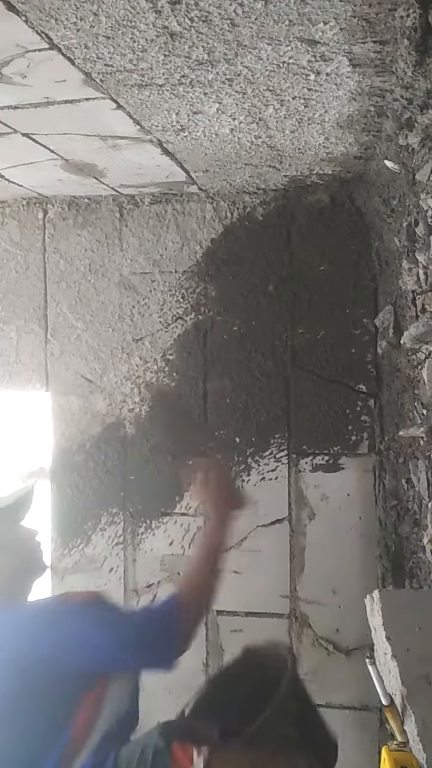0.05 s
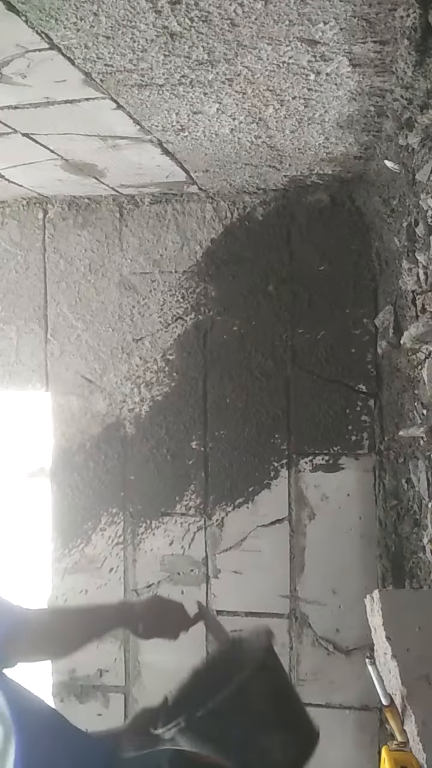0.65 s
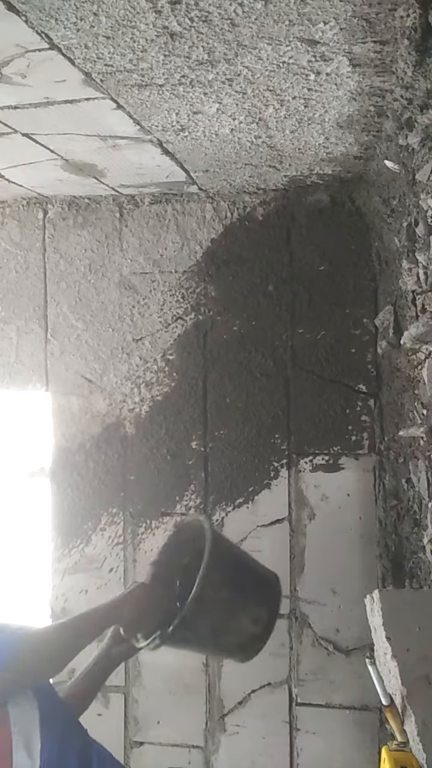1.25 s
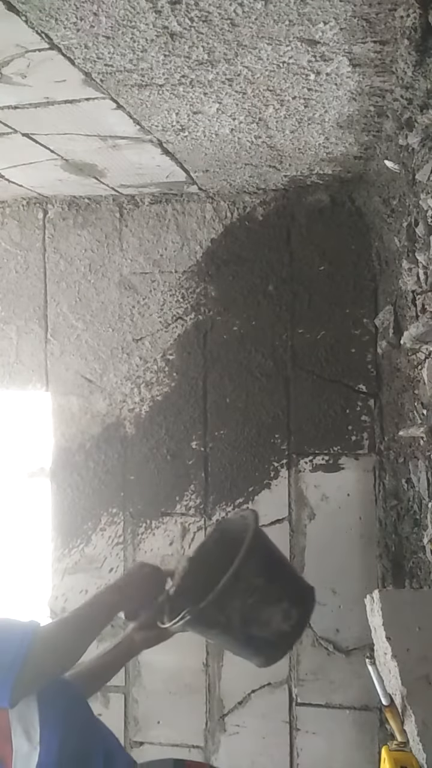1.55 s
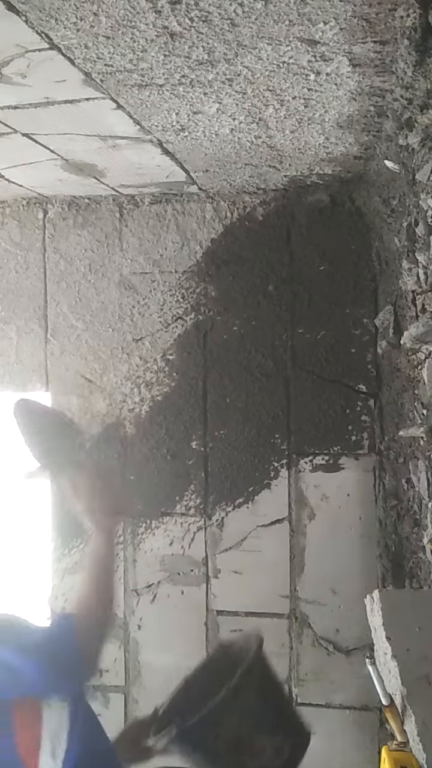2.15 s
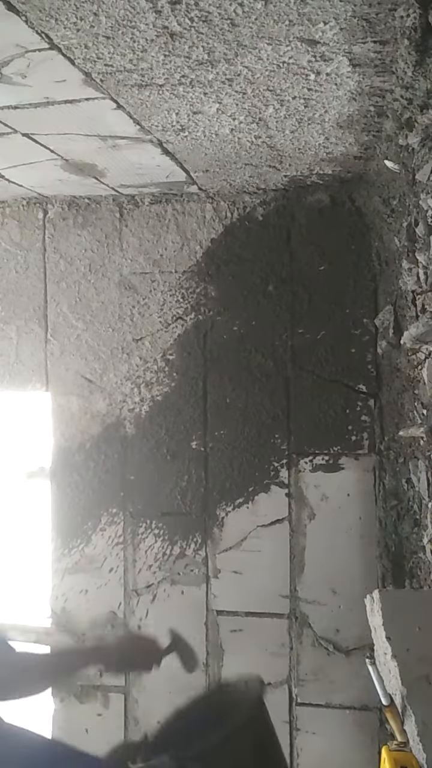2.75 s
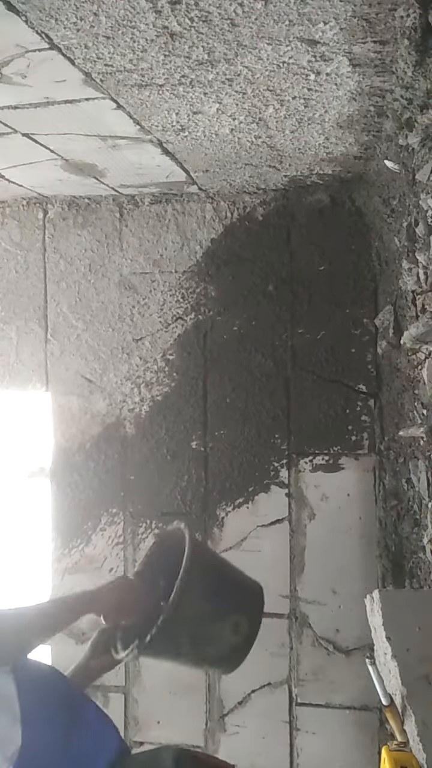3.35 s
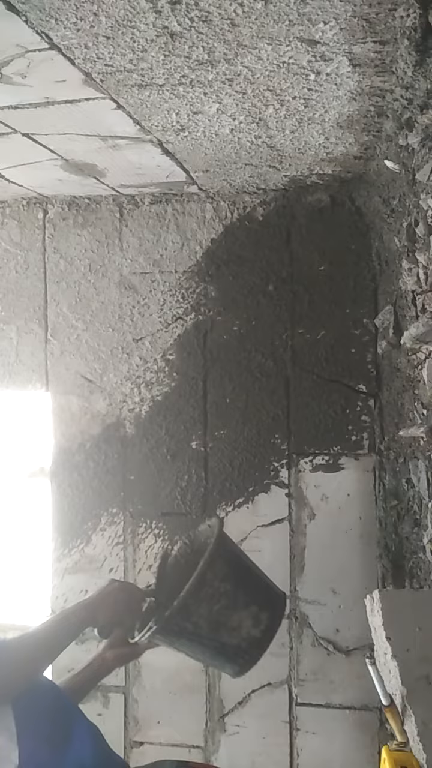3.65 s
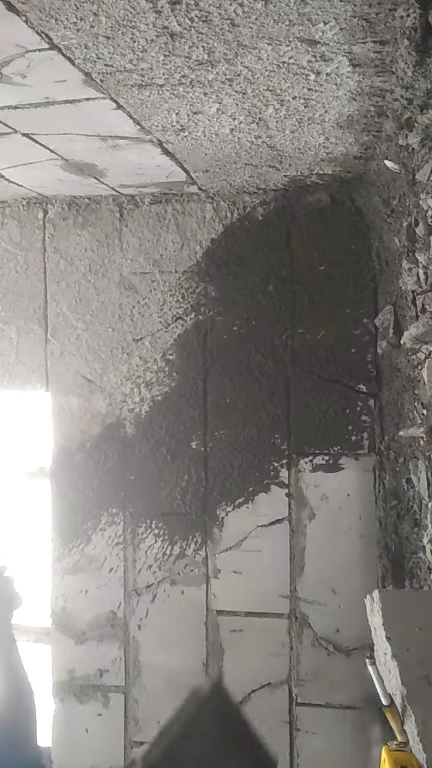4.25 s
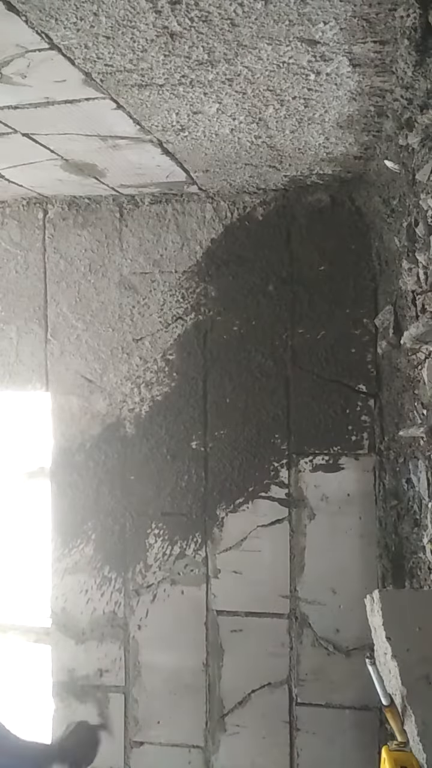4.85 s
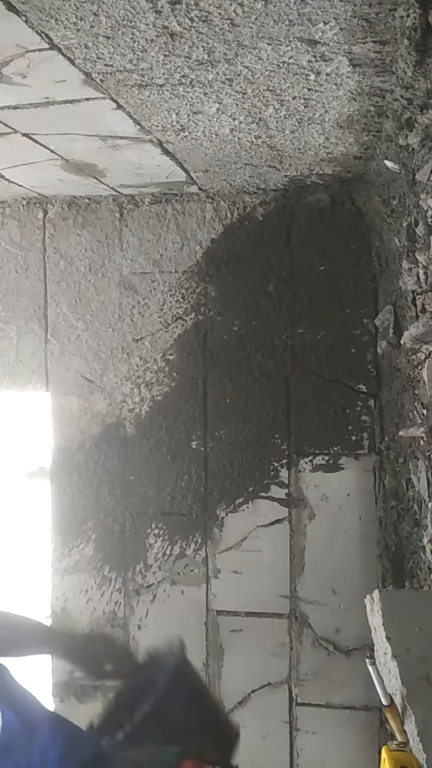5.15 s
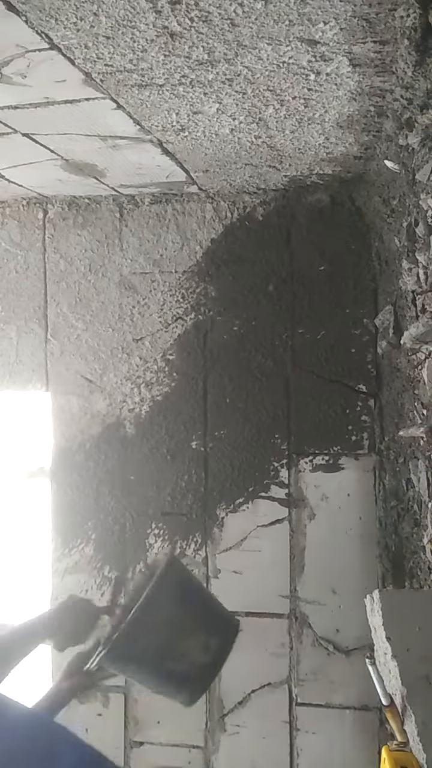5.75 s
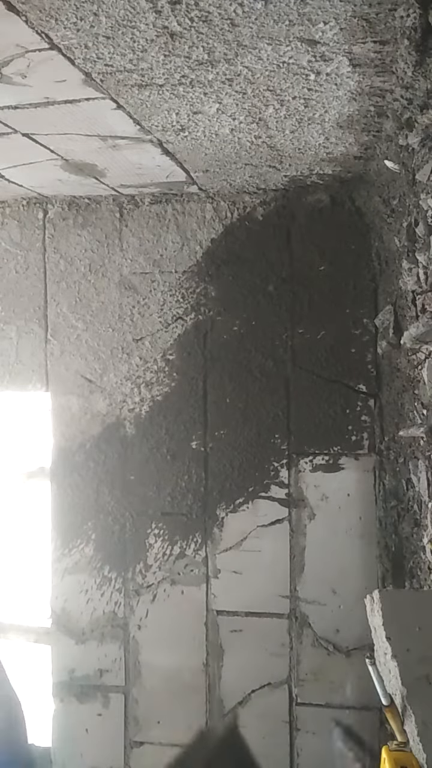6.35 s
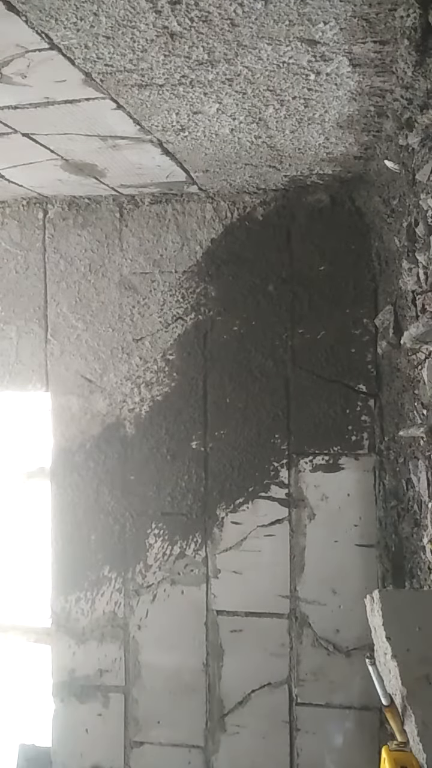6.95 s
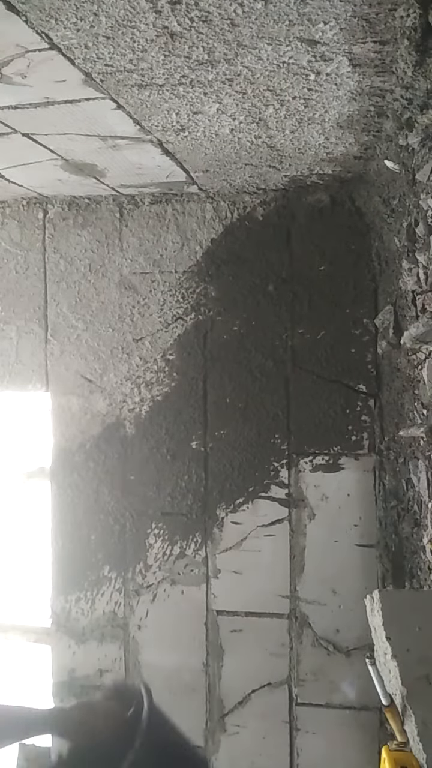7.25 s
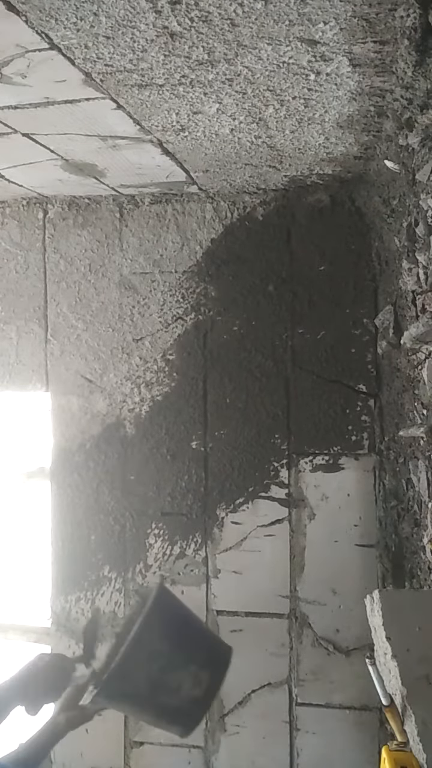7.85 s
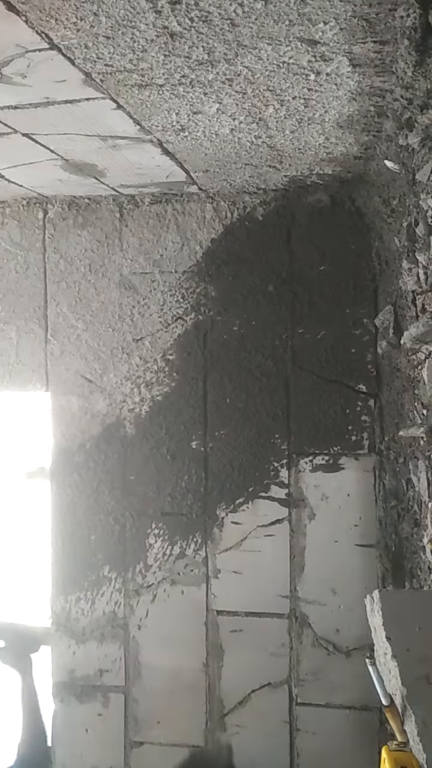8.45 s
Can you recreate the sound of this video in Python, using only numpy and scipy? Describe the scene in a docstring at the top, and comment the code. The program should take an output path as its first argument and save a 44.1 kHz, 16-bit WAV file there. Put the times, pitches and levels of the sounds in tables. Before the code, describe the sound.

A trowel flings cement slurry at a wall: one sharp wet smack, then three softer ones, with splatter falling and light scraping.

```python
"""Cement slurry flung at a block wall in a bare, unfinished room; stereo pair close by, left side to the work.
A load smacks the wall as a dense burst of wet grains, with a faint, brief hiss around it. Spray patters
down, then crumbs, and 0.6 s after the smack what did not stick slops onto the floor. Three more loads
follow, about 2 s apart; the third of the four leaves no slop. In between, the trowel scrapes and ticks in
the bucket. Throughout, soft bumps and a rumble of distant site noise sit mostly on the right microphone."""
import sys
import numpy as np
from scipy import signal
from scipy.fft import rfft, irfft
from scipy.io import wavfile
from scipy.ndimage import uniform_filter1d

SR = 44100
rng = np.random.default_rng(int(sys.argv[2]) if len(sys.argv) > 2 else 0)


def dump(signal):
    """Clip the signal to [-1, 1] and save it as 16-bit WAV at the path in sys.argv[1]."""
    limited = np.clip(np.atleast_2d(signal).T, -1, 1)
    pcm = np.round(limited * 32767).astype(np.int16)
    wavfile.write(sys.argv[1], SR, pcm)


N = 375291
SPAN = 32768  # samples in one short event or room response
SIDES = np.array([[.5], [-.5]])  # splits a pan, always left minus right in dB, between the microphones

# loads hitting the wall: start_s, level_db, spread_s, bass_db, body_db, treble_pan_db, bass_pan_db, thud_db
LOADS = [(0.26, -12.5, .003, -7.5, 11, 2.5, 3, -16.5), (2.4471, -19.5, 0.0041, -20, -2, 3, 9, -50),
         (4.6936, -19, 0.0064, 8, -6, 3, -2, -47), (6.6808, -20.5, 0.009, 3.5, -1.5, 5, -5, -44)]


def smacks():
    """Loads slap the wall, squeeze out pockets of air and push a low thud at the left microphone."""
    # air pockets ringing under the slurry, one list a load: pitch_hz, width_hz, gain_db
    air_pockets = [
        [(440.0, 105, 6), (930, 180, 0.5), (1853, 280, 3), (2430, 180, 9.5), (2780, 110, 11.5), (3850, 1200, 8)],
        [(710, 230, 13), (1040, 300, 7), (2020, 1200, 4), (2660, 1330, 13.5), (4130, 980, 7.5), (8050, 1600, 3)],
        [(730, 30, 10), (1450, 310, 9.5), (1990, 570, 7.5), (2400, 480, 10), (3350, 1040, 13),
         (4740, 1500, 5.5)],
        [(525, 210, 12), (1410, 170, 14), (2090, 440, 6), (2690, 290, 11), (3550, 1440, 11), (4300, 3400, 4.5)],
    ]
    # spectrum of a wet slap: frequency_hz, level_db
    slap_colour = [(70, -17.5), (180, -7.5), (350, -11.5), (700, -7.5), (1200, -9), (2200, -12.5),
                   (3500, -14), (4800, -8), (6500, -1), (8500, 2), (11000, -1.5), (14000, -3)]
    out, hz = np.zeros((2, N)), freqs(SPAN)
    for load, pockets in zip(LOADS, air_pockets):
        s, db, spread_s, bass_db, body_db, pan_db, bass_pan_db, thud_db = load
        tone_db = contour(slap_colour, hz) + weight(bass_db, body_db, hz) + humps(pockets, hz)
        tone_db = tone_db + SIDES * bass_pan_db * below(hz, 420)
        add(out, s, amp(db) * splat(spread_s, tone_db, pan_db, grain_db=5.5, near_db=-1, crack_db=-6))
        thud = swing(nominal_hz=140, cycles=0.7, sag=0.057)
        add(out, s, amp([[thud_db], [thud_db - 16]]) * thud)
    return out


def splat(spread_s, tone_db, pan_db, grain_db, near_db=0, crack_db=-8):
    """A lump bursts into grains that swell and die away between close walls; loudest rms 1."""
    # standing waves between the walls: pitch_hz, width_hz, gain_db
    wall_modes = [(415, 48, 5), (868, 38, 4), (1000, 33, 6), (1960, 19, 7.5), (2490, 33, 1.5),
                  (2506, 23, 5.5), (3520, 41, 1), (3840, 26, 8), (5540, 45, 8), (6490, 27, 6.5),
                  (9710, 37, 1)]
    t, hz = np.arange(SPAN) / SR, freqs(SPAN)
    flow = (t / spread_s) ** 0.61 * np.exp(-t / spread_s)
    burst = unit(grains(SPAN, grain_db)) * flow
    # the head of the lump cracks first, its bulk a moment later
    cracks = [int(.15 * spread_s * SR), int(.9 * spread_s * SR)]
    burst[cracks] += amp(crack_db) * np.sqrt(np.sum(burst ** 2) / 2)
    early = np.exp(-t / .035)
    near = signal.fftconvolve(burst[None], room(near_db) * early, axes=1)[:, :SPAN]
    # later echoes overlap into a wash that keeps only the energy of the burst
    late_energy = signal.fftconvolve(flow ** 2, room_decay() ** 2 * (1 - early ** 2))[:SPAN]
    wash = np.sqrt(np.abs(late_energy)) * unit(grains((2, SPAN), 2.65))
    # the body of the recorder shades the treble
    shade_db = SIDES * pan_db * (below(hz, 14000) - below(hz, 4300))
    sound = colour(near + wash, tone_db + shade_db + humps(wall_modes, hz))
    power = uniform_filter1d(np.mean(sound ** 2, axis=0), size=660)
    return sound / np.sqrt(power.max())


def weight(bass_db, body_db, hz):
    """A thick lump has more bass and body than a thin sheet of slurry; a dB curve."""
    return bass_db * below(hz, 350) + body_db * below(hz, 2770)


def slops():
    """Loose slurry reaches the floor, strung out by its fall."""
    # lumps landing, one list a fall: start_s, level_db, spread_s, bass_db, body_db, treble_pan_db
    falls = [
        [(0.884, -36.5, 0.01, 2, 4, 16.5), (0.900, -38, 0.018, -1, -4, 7), (0.922, -38.5, 0.025, 6, 0.5, 3),
         (0.960, -56, 0.0056, 6, 14, -3)],
        [(3.109, -37.5, 0.015, 15, -7, 11), (3.152, -48.5, 0.012, 3, 2, -2)],
        [(7.306, -47, 0.021, 6, -7, 15), (7.316, -37, 0.02, 18, 1, 7.5)],
    ]
    # spectrum of slurry on the floor: frequency_hz, level_db
    floor_colour = [(200, -29), (400, -3.5), (900, 2.5), (1800, -5.5), (3000, 4), (5000, -5), (8500, -2),
                    (14000, -6.5)]
    # hollow notes, one list a fall: pitch_hz, width_hz, gain_db
    hollow_notes = [
        [(400, 87, 12), (994, 150, 12), (1240, 120.0, 6.2), (1790, 370, 14)],
        [(613, 80, 10), (1000, 180, 9.5), (1640, 600, 20), (9520.0, 950.0, 3.5)],
        [(1480, 120, 13), (1850, 160.0, 12), (3200, 170.0, 1.5), (8400, 2200, 5.5)],
    ]
    out, hz = np.zeros((2, N)), freqs(SPAN)
    for fall, rings in zip(falls, hollow_notes):
        for s, db, spread_s, bass_db, body_db, pan_db in fall:
            tone_db = contour(floor_colour, hz) + weight(bass_db, body_db, hz) + humps(rings, hz)
            slop = splat(spread_s, tone_db, pan_db, grain_db=5, near_db=-0.5, crack_db=-29)
            add(out, s, amp(db) * slop)
    return out


def grit(hiss_lead_s=.03, hiss_db=-33):
    """A faint, brief hiss swells around each smack; spray and crumbs follow, and the trowel scrapes."""
    # what each load sheds: spray_db, crumbs_db, wet_over_sand_db
    debris = [(-56, -50, -7), (-53.5, -58.5, -5), (-51, -52, -10.5), (-58, -54, -2)]
    # the trowel working through gritty slurry: start_s, length_s, sand_db, wet_db
    scrapes = [(1.298, 0.23, -59, -68), (3.54, 0.12, -63, -71), (4.253, 0.34, -58, -63),
               (6.412, .15, -53, -60), (7.802, 0.18, -60.5, -63)]
    # bright spectrum of fine sand: frequency_hz, level_db
    sand_colour = [(1500, -20.5), (4000, -15), (8000, -0.5), (11000, -2.5), (14000, -8.5)]
    # duller spectrum of wet lumps: frequency_hz, level_db
    lump_colour = [(300, -14), (1000, -2), (1800, 0), (3000, -4), (5000, -13), (10000, -24)]
    sand, wet = np.zeros(N), np.zeros(N)
    for (s, db, *_), (spray_db, crumbs_db, wet_db) in zip(LOADS, debris):
        flow = amp(db + hiss_db) * swell(s - hiss_lead_s, 2 * hiss_lead_s)
        # spray bounces straight off the wall; crumbs have to fall first
        flow += amp(spray_db) * surge(s + .09, rise_s=.036, fade_db_per_s=39.5)
        flow += amp(crumbs_db) * surge(s + .25, rise_s=.09, fade_db_per_s=44)
        sand += flow
        wet += amp(wet_db) * flow
    for s, length_s, sand_db, wet_db in scrapes:
        trowel_speed = swell(s, length_s)
        sand += amp(sand_db) * trowel_speed
        wet += amp(wet_db) * trowel_speed
    fine = patter(sand_colour, sand, pan_db=5.5, grain_db=5, cluster_db=4.5)
    lumps = patter(lump_colour, wet, pan_db=-1, grain_db=5, cluster_db=5.5)
    return amp(-6.5) * fine + amp(-5.5) * lumps


def patter(tone, flow, pan_db, grain_db, cluster_db):
    """A clustered stream of grains near the microphones, as strong as the flow."""
    stream = unit(grains(N, grain_db) * amp(cluster_db * walk(70))) * flow
    tone_db = contour(tone, freqs(N))
    stream = colour(stream, tone_db) / np.sqrt(np.mean(amp(tone_db) ** 2))
    return signal.fftconvolve(stream[None], room(near_db=5), axes=1)[:, :N] * amp(SIDES * pan_db)


def surge(start_s, rise_s, fade_db_per_s):
    """A flow that builds up evenly, then thins out."""
    age = np.arange(N) / SR - start_s
    return np.clip(age / rise_s, 0, 1) * amp(-fade_db_per_s * np.maximum(age - rise_s, 0))


def swell(start_s, length_s):
    """One rounded rise and fall, from 0 to 1 and back."""
    part = np.clip((np.arange(N) / SR - start_s) / length_s, 0, 1)
    return np.sqrt(np.abs(np.sin(np.pi * part)))


def ticks():
    """Hard grains click brightly on the blade and the floor, close to the left microphone."""
    # grain strikes: start_s, level_db, spread_s, pitch_hz, resonance_db
    strikes = [(0.504, -43, .0023, 9600, 9), (0.563, -41, 0.0012, 7100, 24),
               (1.438, -55.5, 0.002, 11000, 21), (2.856, -50, 0.0026, 8500, 7),
               (4.971, -49.5, 0.0022, 8000, -1), (5.034, -50.5, .004, 8500, 17),
               (5.565, -47, .0027, 10400, 22), (6.946, -38, 0.00144, 7800, 11),
               (6.954, -39.5, .0008, 7700, 10)]
    out = np.zeros((2, N))
    for s, db, spread_s, ring_hz, ring_db in strikes:
        add(out, s, amp(db) * ping(spread_s, ring_hz, ring_db, pan_db=12, width=0.68))
    return out


def drops(ring_db_per_octave=-12.5):
    """Wet drops plop, each on one hollow note; bigger, lower drops ring more clearly."""
    # single drops landing: start_s, level_db, spread_s, pitch_hz, treble_pan_db
    plops = [(0.444, -43.5, 0.0021, 910, -3), (0.452, -48.5, .01, 424, -6), (0.618, -53, .013, 1290, -10),
             (0.999, -50, .01, 1770, 10), (1.468, -53.5, 0.0084, 1200, -14),
             (3.080, -47.5, 0.0019, 2500, 11), (4.066, -56, 0.0028, 1850, 8), (4.35, -55, .005, 1940, 2),
             (5.111, -56, 0.00215, 1900, 15), (5.158, -56.5, .002, 1720, 0), (6.95, -53.5, .004, 1080, -2),
             (7.045, -51, 0.003, 1980, 3), (7.07, -55, .012, 1780, 6)]
    out = np.zeros((2, N))
    for s, db, spread_s, ring_hz, pan_db in plops:
        ring_db = 24.5 + ring_db_per_octave * np.log2(ring_hz / 1100)
        add(out, s, amp(db) * ping(spread_s, ring_hz, ring_db, pan_db, width=0.77))
    return out


def ping(spread_s, ring_hz, ring_db, pan_db, width):
    """A tiny, close splat with one broad resonance, its width a fraction of its pitch."""
    # spectrum of a small impact: frequency_hz, level_db
    impact_colour = [(100, -7), (700, 0.5), (2500, 4), (4500, -2.5), (8000, 3.5), (14000, -4.5)]
    hz = freqs(SPAN)
    tone_db = contour(impact_colour, hz) + humps([(ring_hz, width * ring_hz, ring_db)], hz)
    return splat(spread_s, tone_db, pan_db, grain_db=1, near_db=6)


def bumps(left_db=-24, faint_count=45, rattle_db=-15, rattle_s=0.018):
    """Soft bumps on the right microphone, each with a short dull rattle, and fainter ones at random."""
    # the distinct bumps: start_s, level_db, nominal_pitch_hz
    knocks = [(0.73, -38, 159), (1.257, -39, 210), (2.248, -31, 252), (2.831, -29.5, 268),
              (2.846, -26, 340), (2.857, -31.5, 170), (2.866, -35, 268), (2.887, -32.5, 250),
              (3.249, -41, 159), (3.751, -36, 188), (3.876, -39.5, 153), (4.071, -39.5, 260),
              (4.114, -37, 159), (6.158, -34.5, 314), (6.45, -36.5, 282), (7.742, -34.5, 336),
              (7.934, -30.5, 252)]
    out = np.zeros(N)
    for s, db, hz in knocks:
        rattle = unit(irfft(rfft(rng.standard_normal(SPAN)) * below(freqs(SPAN), 850)))
        rattle *= amp(rattle_db) * np.exp(-np.arange(SPAN) / SR / rattle_s)
        add(out, s, amp(db) * (swing(hz, cycles=0.74, sag=0.61) + rattle))
    for when, size, pitch in rng.random((faint_count, 3)):
        faint = swing(110 + 300 * pitch, cycles=0.44, sag=0.79)
        add(out, when * N / SR, amp(-55.5 + 9.4 * size) * faint)
    return out * amp([[left_db], [0]])


def swing(nominal_hz, cycles, sag):
    """One heavily damped swing that starts above its nominal pitch and slows as it dies; peak 1."""
    turns = nominal_hz * np.arange(SPAN) / SR
    phase = 2 * np.pi * np.log1p(2 * sag * turns) / sag * 0.81
    wave = np.sin(phase) * turns * np.exp(-2.4 * turns / cycles)
    return wave / np.abs(wave).max()


def room(near_db, direct_db=-5, right_lag_samples=12):
    """Direct sound and uneven echoes; the left microphone faces the work, the right hears mostly walls."""
    response = unit(grains((2, SPAN), 1.92)) * room_decay()
    response[0, 0] = amp(direct_db + near_db)
    response[1, right_lag_samples] = amp(direct_db + near_db - 10.5)
    return response


def room_decay(room_t60_s=0.14, tail_t60_s=0.94, tail_db=-31):
    """Bare close walls give a quick decay; the rooms beyond add a faint long tail. Energy 1."""
    t = np.arange(SPAN) / SR
    decay = amp(-60 * t / room_t60_s) + amp(tail_db - 60 * t / tail_t60_s)
    return unit(decay) / np.sqrt(SPAN)


def site_noise(flutter_db=4, shared=0.37):
    """The distant site: a fluttering rumble, partly common to both sides, under hiss and a faint whistle."""
    # spectrum of the background: frequency_hz, level_db
    site_colour = [(18, -55), (30, -26), (70, -8), (186, -2.5), (354, -4.5), (413, -5), (458, -7),
                   (674, -7.5), (1460, -15.5), (1610, -15), (2140, -15), (4750, -20.5), (7170, -21),
                   (10300, -18.5), (14000, -22)]
    # its lean toward the right microphone: frequency_hz, pan_db
    balance = [(60, -7), (250, -6.5), (700, -4.5), (2000, -4), (6000, -2.5), (13000, -2.5)]
    # its slow drift in loudness: time_s, level_db
    drift = [(0, -55), (2, -57), (4.3, -56), (7.9, -57.5), (8.2, -59)]
    hz = freqs(N)
    whistle_db = humps([(10300, 310, 4.4)], hz)
    tone_db = contour(site_colour, hz) + whistle_db + SIDES * contour(balance, hz)
    hiss = rng.standard_normal((2, N))
    rumble = unit(hiss + shared * rng.standard_normal(N))
    rumble *= amp(flutter_db * np.array([walk(49), walk(45)]))
    low = below(hz, 640)
    noise = irfft(rfft(rumble) * low + rfft(hiss) * (1 - low), N)
    level_db = np.interp(np.arange(N) / SR, *np.transpose(drift))
    return unit(colour(noise, tone_db)) * amp(level_db)


def grains(shape, spread_db):
    """Dense clicks of very uneven size."""
    return rng.standard_normal(shape) * amp(spread_db * np.minimum(rng.exponential(size=shape), 2 * np.pi))


def walk(rate_hz):
    """Smooth random wander, spread near 1."""
    hold = int(SR / rate_hz)
    return uniform_filter1d(np.repeat(rng.standard_normal(N // hold + 1), hold), hold)[:N]


def colour(x, db):
    """Causal filter with the given dB curve, by way of the cepstrum."""
    size = x.shape[-1]
    cepstrum = irfft(np.log(amp(db)), size)
    fold = 1 + np.sign(size / 2 - np.arange(size))
    fold[0] = 1
    return irfft(rfft(x) * np.exp(rfft(cepstrum * fold)), size)


def contour(points, hz):
    """Join (frequency_hz, level_db) points on a log-frequency axis."""
    f, db = np.transpose(points)
    return np.interp(np.log(hz), np.log(f), db)


def humps(rings, hz):
    """Resonances (pitch_hz, width_hz, gain_db) as a dB curve."""
    return sum(db / (1 + (2 * (hz - f) / width) ** 2) for f, width, db in rings)


def below(hz, edge_hz):
    """Soft shelf: 1 under the edge, 0 over it."""
    return 1 / (1 + (hz / edge_hz) ** 4)


def freqs(size):
    """Frequencies of a spectrum of this many samples."""
    return np.maximum(np.fft.rfftfreq(size, 1 / SR), 1)


def amp(db):
    """Decibels to gain."""
    return 10 ** (np.asarray(db) / 20)


def unit(x):
    """Scale to rms 1."""
    return x / np.sqrt(np.mean(x ** 2))


def add(out, start_s, x):
    """Mix x into out from start_s."""
    start = int(start_s * SR)
    out[..., start:start + x.shape[-1]] += x[..., :N - start]


def scene():
    """The work at the wall and its background, as they reach the two microphones."""
    return smacks() + slops() + ticks() + drops() + grit() + bumps() + site_noise()


def record(dry):
    """The recorder cuts the top steeply."""
    top_hz = 14350
    return signal.sosfilt(signal.ellip(10, .2, 75, top_hz, fs=SR, output="sos"), dry)


dry = scene()
out = record(dry)
dump(out)
```